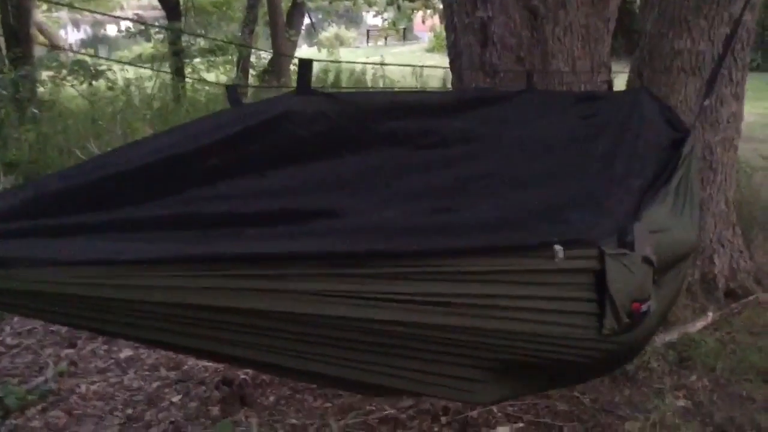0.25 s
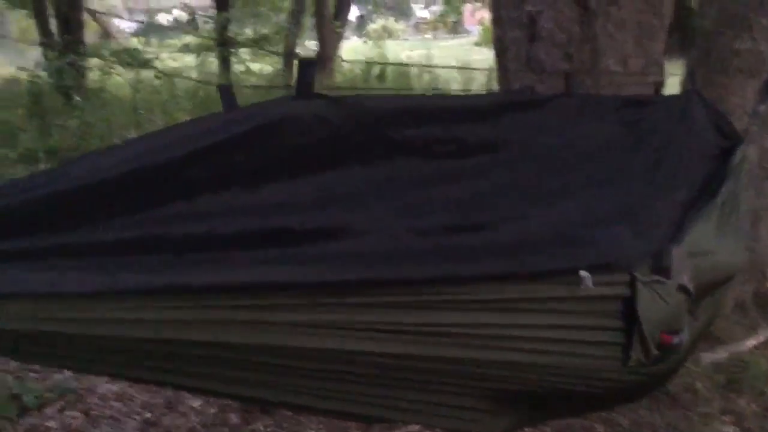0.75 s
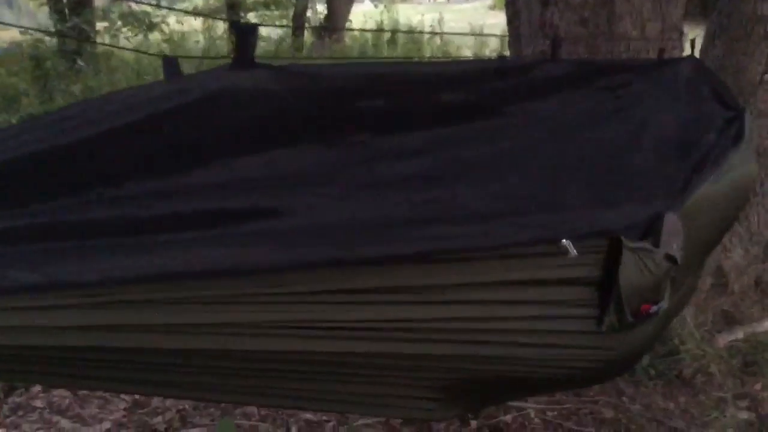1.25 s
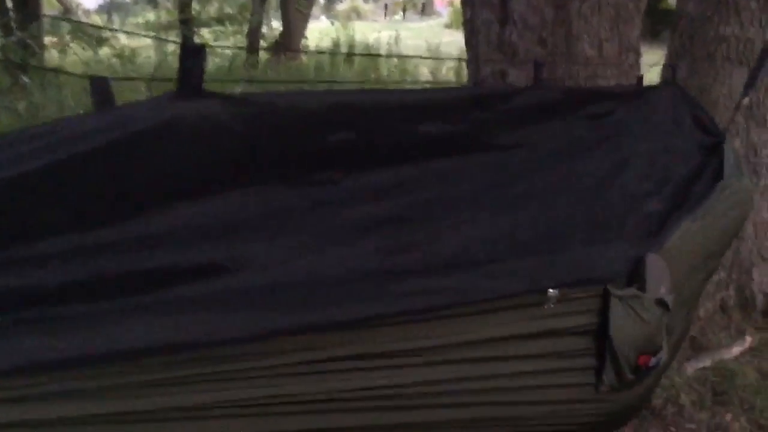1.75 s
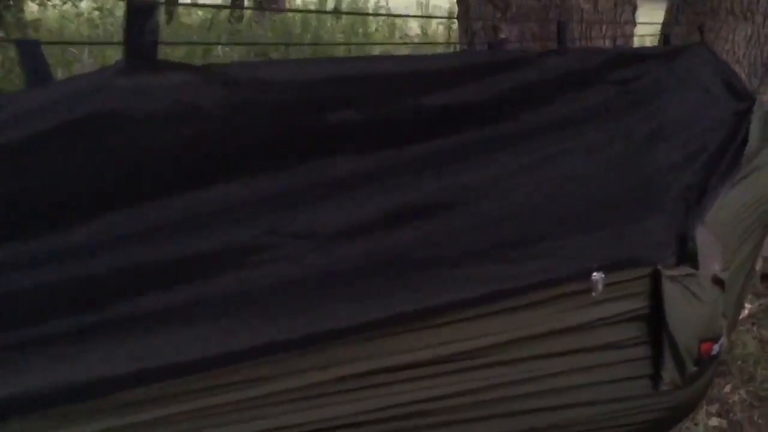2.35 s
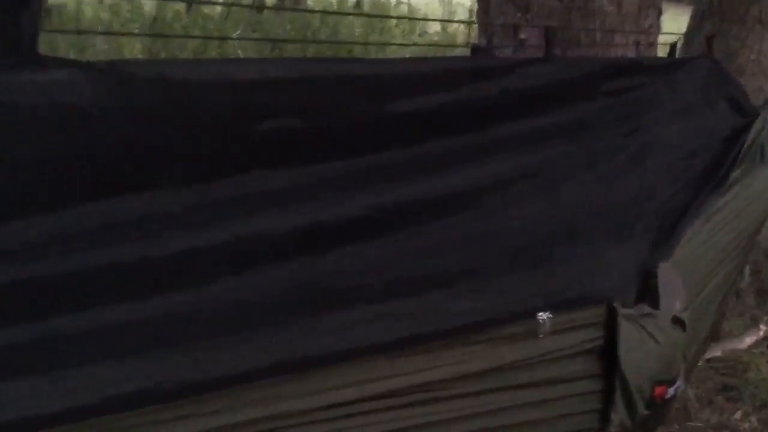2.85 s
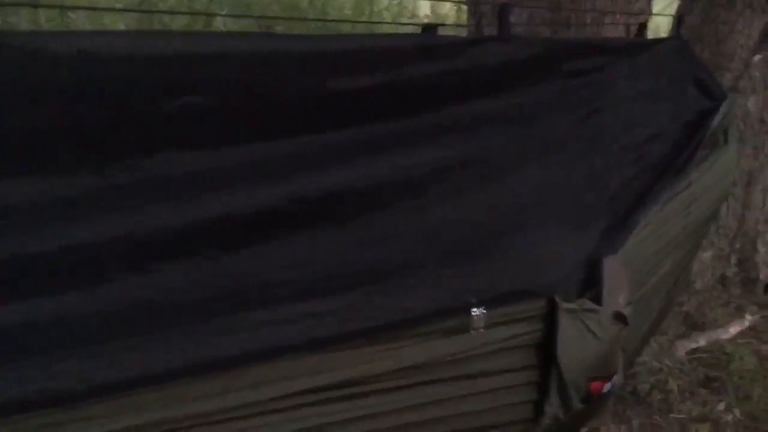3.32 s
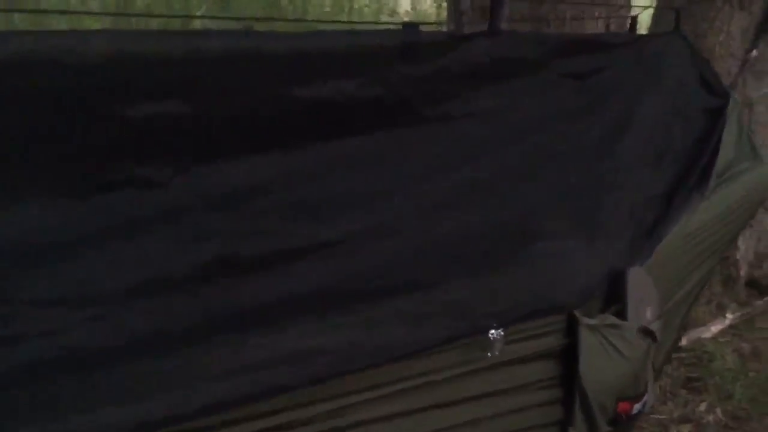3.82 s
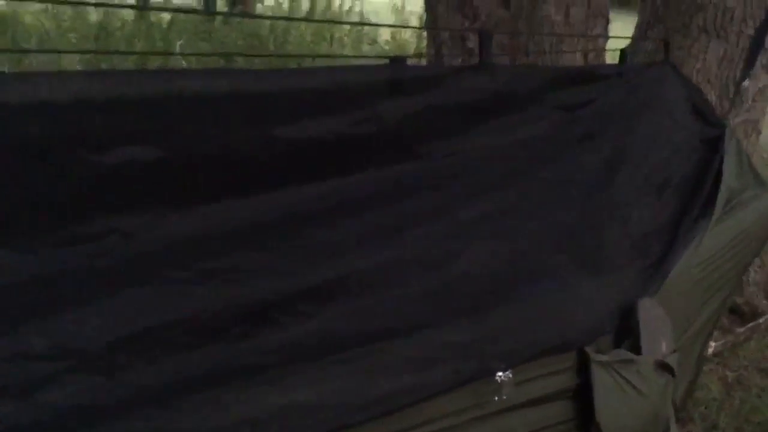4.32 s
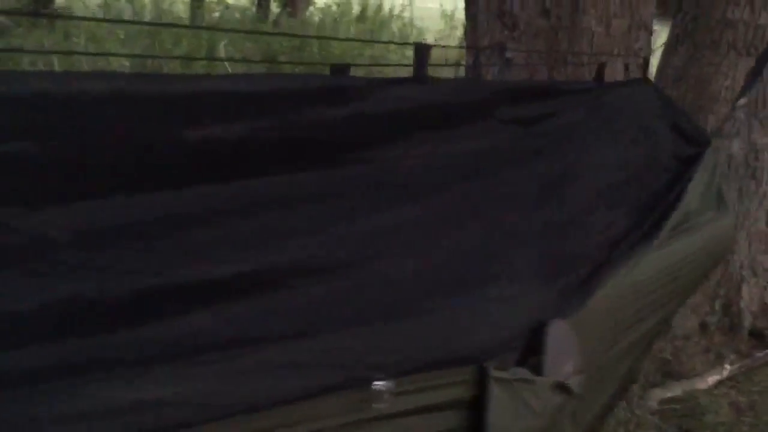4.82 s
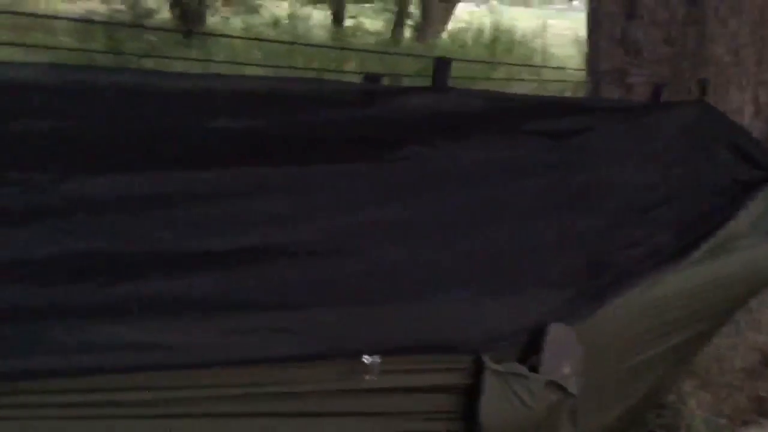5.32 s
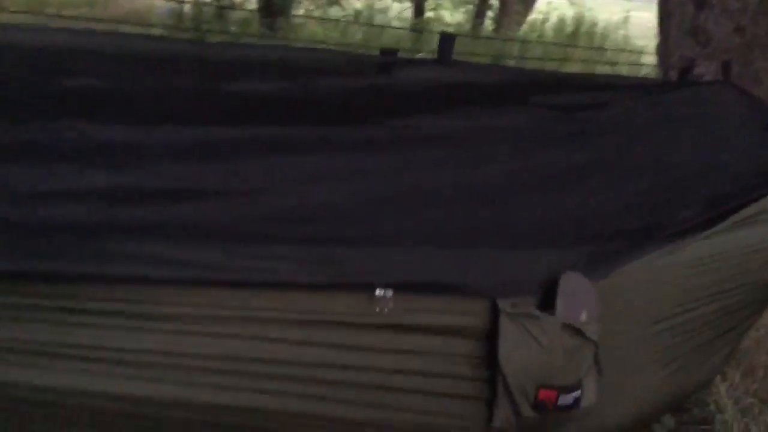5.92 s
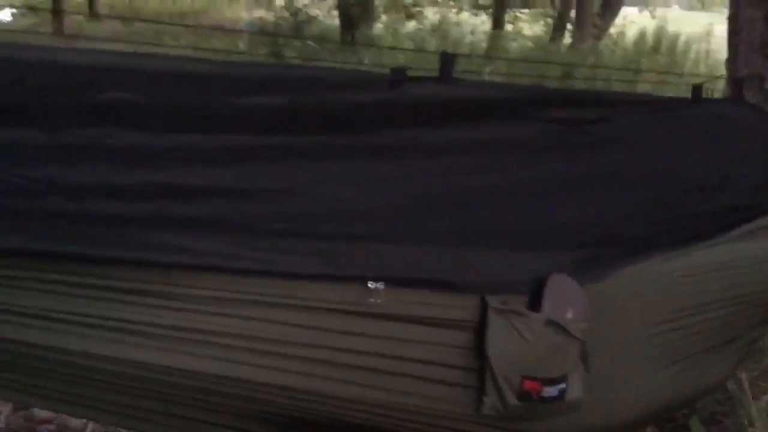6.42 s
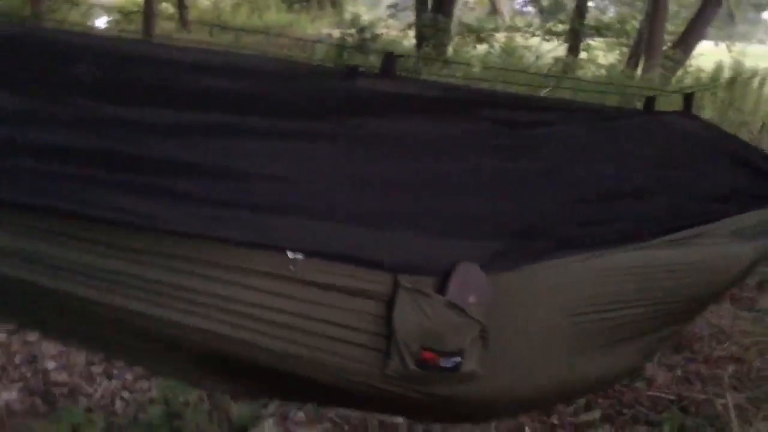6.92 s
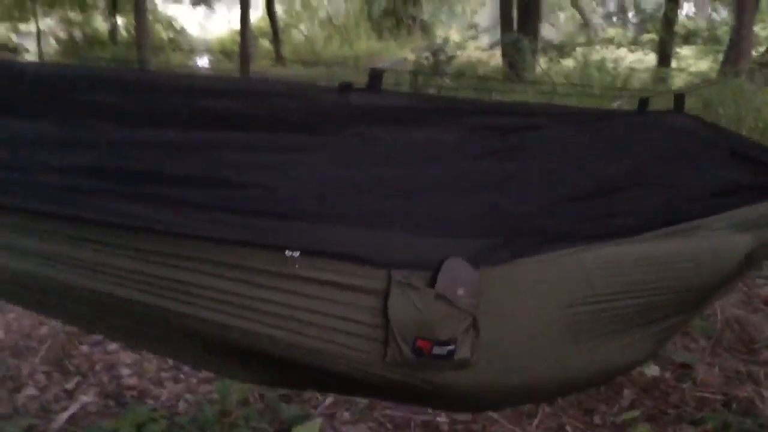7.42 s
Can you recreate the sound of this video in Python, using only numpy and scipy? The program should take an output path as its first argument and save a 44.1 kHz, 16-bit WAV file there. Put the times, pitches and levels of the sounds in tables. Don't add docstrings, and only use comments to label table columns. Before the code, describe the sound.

A close, dry, brittle texture of twig ticks and crumpling leaves under slow soft footsteps. The first half is sparse, with one small woody crack; three loud snaps follow in the second half, then busier scraping, clicks and a split snap. Distant vehicles swell gently and fade, a far cricket pulses early, insects hiss steadily, and one faint bird-like call comes near the end. Open wooded place, small hand-held microphone with little bass.

```python
import sys
import numpy as np
from scipy import signal
from scipy.fft import rfft, irfft, next_fast_len
from scipy.io import wavfile
from scipy.ndimage import uniform_filter1d

SR = 44100
rng = np.random.default_rng(int(sys.argv[2]) if len(sys.argv) > 2 else 0)


def unload_audio(sound):
    columns = np.transpose(np.atleast_2d(sound))
    steps = np.round(np.clip(columns, -1, 1) * 32767)
    wavfile.write(sys.argv[1], SR, steps.astype(np.int16))


def invert_db(level):
    return 10 ** (np.asarray(level, dtype=float) / 20)


N = 337754

PORT_HZ = 11870


def shape(x, db_of_hz):
    size = next_fast_len(N)
    f = np.maximum(np.arange(size // 2 + 1) * SR / size, 1)
    steady_top_hz = 15780
    gain = invert_db(db_of_hz(f)) * (f < steady_top_hz)
    y = irfft(rfft(x, size) * gain, size)[:N]
    return y / np.std(y)


def colour(x, points):
    hz, db = np.transpose(points)
    return shape(x, lambda f: np.interp(np.log(f), np.log(hz), db))


def band(x, hz, width):
    return shape(x, lambda f: -10 * np.log10(np.e) * ((f - hz) / width) ** 2)


def noise_band(hz, width):
    return band(rng.standard_normal(N), hz, width)


def walk(rate):
    k = int(SR / rate)
    held = np.repeat(rng.standard_normal(N // k + 1), k)
    return 1.5 * uniform_filter1d(uniform_filter1d(held, k), k)[:N]


def grit(rate, spread_db, smooth):
    hit = rng.random(N) < rate / SR
    size_db = spread_db * np.minimum(rng.exponential(1, N), 3)
    grains = hit * rng.choice([-1, 1], N) * invert_db(size_db)
    return grains / np.std(grains) + smooth * rng.standard_normal(N)


def ring(hz, tau, turn=0.):
    t = np.arange(1024) / SR
    envelope = (t / tau * np.exp(1 - t / tau)) ** 2
    wave = np.cos(2 * np.pi * (hz * (t - tau) + turn))
    return envelope * (wave - np.sum(envelope * wave) / np.sum(envelope))


def add(out, s, x):
    i = int(s * SR)
    out[i:i + len(x)] += x[:N - i]


def curve(table):
    rows = np.array(table, float)
    return [np.interp(np.arange(N) / SR, rows[:, 0], c) for c in rows.T[1:]]


def swell(s, gain, rise_s, hold_s, fall_s):
    t = np.arange(0, N, 32)[:, None] / SR
    before = np.maximum(s - t, 0) / rise_s
    after = np.maximum(t - s - hold_s, 0) / fall_s
    envelope = np.sum(gain * invert_db(-25 * (before + after)), axis=1)
    return np.interp(np.arange(N) / SR, t[:, 0], envelope)


def crack(snap, wood, pitch):
    _, db, hz, twin_db, upper_db = snap
    knock_db, knock_hz, middle_db, thud_db, edge_db = wood
    port = ring(pitch * hz, 0.000289)
    port += invert_db(twin_db) * ring(1.2 * pitch * hz, 0.000278)
    port -= invert_db(upper_db + 12.5) * ring(PORT_HZ, 0.000424)
    fibres = rng.standard_normal(1024) * np.exp(-np.arange(1024) / SR / 0.0011)
    frayed = np.convolve(fibres, ring(7600, 0.000195))[:1024]
    knock = invert_db(knock_db) * ring(pitch * knock_hz, 0.00028)
    middle = invert_db(middle_db + 4.5) * ring(1500, 0.00035)
    edge = invert_db(edge_db + 9) * ring(14700, 0.00031)
    thud = invert_db(thud_db + 14.0) * ring(583, 0.00043)
    return invert_db(db) * (port + invert_db(-31) * frayed) - knock - middle + edge - thud


def snaps():
    # start [s], peak [dB], ring [Hz], twin ring [dB], upper ring [dB].
    snap_rows = [
        (0.858, -26, 7150, -11, -29.5),
        (4.579, -10.5, 7940, -16, -24.5),
        (5.1846, -10, 7720, -8.5, -17),
        (5.4633, -8, 7570, -21.5, -31.5),
        (6.9204, -18, 6900, -2.5, -22),
        (7.3769, -26, 7660, -17, -28),
        (7.5036, -23, 7950, -22, -23),
    ]
    # knock peak [dB], knock [Hz], middle, thud and edge [dB].
    wood_rows = [(-35, 3400, -55, -67, -66), (-31.5, 2860, -54, -50.5, -54), (-38, 2540, -54, -47.5, -43),
                 (-22, 3470, -50, -46.5, -40), (-23.5, 2930, -34, -42.5, -41), (-48, 2800, -58, -50, -59),
                 (-69, 2700, -59, -61, -53)]
    # wait [s], level under the first [dB].
    second_cracks = [(.0033, -21), (0.0044, -3.5), (0.012, -41), (.0051, -18), (0.0043, -12), (0.0048, -30),
                     (.0044, -32)]
    out = np.zeros(N)
    for snap, wood, (wait, again_db) in zip(snap_rows, wood_rows, second_cracks):
        s = snap[0]
        add(out, s + .0005, invert_db(-18) * crack(snap, wood, 0.943))
        add(out, s + .001, crack(snap, wood, 0.96))
        add(out, s + .0006 + wait, invert_db(again_db - 18) * crack(snap, wood, 0.93))
        add(out, s + .0011 + wait, invert_db(again_db) * crack(snap, wood, 0.92))
    return out


def wood_chip():
    # start [s], peak [dB], ring [Hz].
    chip_rows = [
        (2.799, -18.5, 2180),
    ]
    out = np.zeros(N)
    for s, db, hz in chip_rows:
        burst = ring(hz, 0.0005) + invert_db(-3.5) * ring(10600, .00006)
        burst += invert_db(-22) * ring(0.32 * hz, 0.00056) + invert_db(-15.5) * ring(2.0 * hz, 0.00024)
        splinter = ring(1.15 * hz, 0.00039) + ring(1.7 * hz, 0.00022)
        add(out, s + 0.00021, invert_db(db) * burst)
        add(out, s + 0.00166, invert_db(db - 24) * ring(1.7 * hz, 0.00048))
        add(out, s + .0035, invert_db(db - 15) * splinter)
    return out


def ticks():
    # start [s], peak [dB], ring [Hz].
    tick_rows = [(0.143, -49, 7900), (0.5367, -42, 14100), (0.6804, -42, 7840), (0.76, -41, 8070),
                 (1.0221, -50, 7660), (1.068, -48, 9000), (2.2228, -41, 13900), (2.238, -36.5, 9800),
                 (2.2754, -48, 8100), (2.4543, -42, 7850), (2.4944, -49, 7830), (2.6074, -46, 8140),
                 (3.29, -53, 11000), (3.359, -45, 10500), (4.7456, -41, 8050), (4.974, -42, 7860),
                 (4.9949, -56, 7780), (5.0097, -34, 7800), (5.4938, -48, 8000), (6.02, -38, 7900),
                 (6.0402, -45, 7840), (6.0556, -44, 8100), (6.558, -44, 7900), (6.6603, -30, 7800),
                 (6.679, -30, 7960), (7.1571, -43, 7860), (7.198, -28, 7940), (7.2279, -39, 8270),
                 (7.4649, -33, 7580)]
    out = np.zeros(N)
    for (s, db, hz), turn in zip(tick_rows, rng.random(len(tick_rows))):
        tick = ring(hz, 0.000243, turn) + invert_db(-4.5) * ring(PORT_HZ, 0.00029)
        add(out, s + 0.00048, invert_db(db - 5.5) * tick)
    return out


def litter_knocks():
    # start [s], peak [dB], ring [Hz].
    seed_rows = [(0.9477, -57, 2360), (2.3094, -58, 4800), (2.4294, -57, 5940), (2.6078, -54, 4700),
                 (5.0085, -51, 6200), (5.7952, -57.5, 2260), (6.7475, -55, 4460), (6.788, -53, 4560),
                 (6.8283, -49, 5340), (6.85, -55, 5230), (6.9455, -49, 2210)]
    # start [s], peak [dB], ring [Hz].
    knock_rows = [
        (1.051, -61, 625),
        (6.308, -52, 810),
        (6.531, -59.5, 460),
        (6.831, -55, 1680),
        (6.873, -56, 1250),
        (6.978, -55, 550),
        (7.655, -56, 1900),
    ]
    out = np.zeros(N)
    for s, db, hz in seed_rows:
        add(out, s, invert_db(db + 5) * (ring(hz, 0.84 / hz) + invert_db(-10) * ring(0.45 * hz, 0.99 / hz)))
    for s, db, hz in knock_rows:
        add(out, s, invert_db(db + 4.5) * (ring(hz, 1.49 / hz) + invert_db(-12) * ring(1.9 * hz, 0.67 / hz)))
    return out


def strokes():
    # top reached [s], level [dB], rise [s], hold [s], fall [s].
    stroke_rows = [(.165, -63, 0.046, .015, .04), (.55, -73, .1, .08, 0.071),
                   (.735, -66, .05, 0.023, 0.026), (1.025, -51.5, 0.098, 0.011, 0.037),
                   (2.839, -56, .07, 0.022, 0.051), (3.77, -57, 0.061, .002, .055),
                   (4.17, -65.5, .05, .02, .06), (4.645, -56, 0.045, .003, 0.026),
                   (4.744, -50.5, .022, .002, 0.083), (4.923, -71, .03, .01, 0.052),
                   (5.012, -49.5, 0.056, 0.0035, 0.026), (5.21, -67, .01, .01, .06),
                   (5.497, -53, 0.039, .002, .005), (5.678, -45.5, 0.065, 0.043, .036),
                   (6.061, -52.5, 0.047, .004, 0.019), (6.132, -58.5, 0.031, .002, 0.087),
                   (6.292, -60, 0.095, .004, 0.061), (6.536, -52.5, 0.12, .002, 0.1),
                   (6.662, -50.5, 0.042, .006, 0.024), (6.975, -43.5, 0.071, 0.032, 0.027),
                   (7.163, -44, 0.046, 0.04, 0.032), (7.231, -43.5, 0.024, .018, 0.0055),
                   (7.384, -51.5, .005, .002, 0.031), (7.468, -45, 0.064, 0.0303, 0.0034)]
    # frequency [Hz], density [dB per Hz].
    port_points = [(1290, -36), (2200, -15.5), (2890, -24), (3700, -21), (4220, -27.5), (4860, -23),
                   (5410, -23), (6540, -3.5), (8100, -1), (10200, -19), (10900, -14.5), (11900, -8.5),
                   (13000, -15), (14300, -13), (15800, -24)]
    sheen_db = [0.1, 0.1, 2, -0.5, -1, -1, 1.5, 5, -1, -1, 1, 0, -2, 0.5, 2, -2, 10, -1, 9, 0.5, 1, 1, 3, 3]
    rub, fine = (grit(4000, 3.2, 0.62) * invert_db(2.3 * walk(200)) for _ in range(2))
    main_points = [(hz, db - 25 * (hz > 10300) - 15 * (hz < 4500)) for hz, db in port_points]
    bright_points = [(hz, db - 25 * (hz < 10000)) for hz, db in port_points]
    main = colour(rub, main_points)
    bright = colour(fine + 0.23 * rub, bright_points)
    thud, shell = band(fine, 1080, 810), band(rub, 3640, 570)
    s, db, rise, hold, fall = np.transpose(stroke_rows)
    ref_db, thud_growth = -50.5, 0.32
    press_db = ref_db + thud_growth * (db - ref_db)
    push = swell(s, invert_db(db), rise, hold, fall)
    press = swell(s, invert_db(press_db), 1.76 * rise, hold, 2.1 * fall)
    sheen = swell(s, invert_db(db - 10.5 + np.array(sheen_db)), rise, hold, fall)
    return push * (main + invert_db(-24) * shell) + sheen * bright + press * invert_db(-16) * thud


def leaves():
    # top reached [s], crisp level [dB], hold [s],
    # papery body against it [dB], share of broad leaves [0-1].
    tread_rows = [(0.153, -82, 0.042, -14, .16), (0.51, -73, 0.03, -13, 0), (0.603, -73, .05, -7, .6),
                  (1.133, -69, 0.36, -7, .2), (1.66, -75.5, 0.18, -9, .3), (1.89, -73.5, .05, -1.5, .2),
                  (2.164, -60, 0.1, -8.5, 0.1), (2.345, -67, .09, -4, 0.4), (2.49, -67.5, .03, -16, .7),
                  (2.566, -70.5, .04, -8, .2), (3.05, -82, .03, -17, .3), (3.498, -73, 0.16, -12, .3),
                  (3.94, -68, .012, -2, 0.4), (4.187, -74, 0.17, -12, .3), (4.844, -68, .012, -22, 1),
                  (5.084, -67, .04, -14, .9), (5.272, -69.5, .012, 1, .2), (5.585, -60, 0.052, -20, .9),
                  (5.94, -74, .03, -2, .3), (6.108, -73, 0.2, -2, 0.2), (6.78, -69, 0.08, -4.5, .4),
                  (7.03, -61.5, 0.026, -8.5, .4), (7.27, -77, 0.022, -1.5, .4), (7.51, -69, .01, -7, .4),
                  (7.62, -70, .05, -9, .45)]
    crumple = grit(900, 3.7, .9) * invert_db(1.4 * walk(60))
    small, broad = band(crumple, 13000, 4500), band(crumple, 10200, 1800)
    body = band(crumple, 3410, 1700)
    s, db, hold, body_db, share = np.transpose(tread_rows)

    def tread(gain):
        rise_s, fall_s = 0.078, 0.093
        return swell(s, invert_db(db) * gain, rise_s, hold, fall_s)

    steps = tread(1 - share) * small + tread(share) * broad + tread(invert_db(body_db)) * body
    settle = invert_db(-83.5 + 1.6 * walk(6)) * (small + invert_db(-3.5) * body)
    return steps + settle


def lorry():
    # time [s], rumble [dB], firing tone [dB].
    pass_rows = [
        (0, -74, -85),
        (1., -74.5, -97),
        (2.4, -72, -92),
        (3.4, -71, -80),
        (3.97, -68, -67),
        (4.35, -65, -68.5),
        (5., -71, -69.5),
        (5.6, -92, -87),
        (7.66, -74.5, -73),
    ]
    rumble_db, tone_db = curve(pass_rows)
    return invert_db(rumble_db - 9) * noise_band(88, 25.5) + invert_db(tone_db - 5) * noise_band(134.6, 3.6)


def whine():
    # time [s], pitch [Hz], level [dB].
    glide = [
        (0, 1028, -67),
        (.08, 927, -67.5),
        (.13, 880, -81),
        (.2, 900, -130),
    ]
    hz, db = curve(glide)
    return invert_db(db + 5.5) * np.sin(2 * np.pi * np.cumsum(hz) / SR)


def road():
    # nearest [s], level [dB], time to fade [s].
    car_rows = [
        (0., -74, 0.5),
        (3.86, -62.5, 1.4),
        (6.15, -67, 1.14),
        (7.66, -65, 1.1),
    ]
    s, db, fade = np.transpose(car_rows)
    cars = np.hypot(invert_db(-68.5), swell(s, invert_db(db), fade, 0, fade))
    roar = noise_band(992, 267) + invert_db(-7.5) * noise_band(1520, 440)
    return cars * invert_db(-4.5 + walk(2.59) + 1.26 * walk(9)) * roar


def motor_drone():
    # time [s], level [dB].
    level_points = [
        (0, -68),
        (.55, -75),
        (1.3, -64),
        (2.4, -67),
        (3.2, -64.5),
        (4.2, -68.5),
        (5.5, -72),
        (6.6, -95),
        (7.66, -75),
    ]
    hum = noise_band(192.8, 10.2) + invert_db(-15) * noise_band(383.4, 9.5)
    return invert_db(curve(level_points)[0] - 2) * hum


def insects():
    high = invert_db(-70.5 + 0.64 * walk(8.6) + 0.53 * walk(1.9)) * noise_band(7920, 420)
    low = invert_db(-81 + 1.2 * walk(5)) * noise_band(5750, 230)
    return high + low


def cricket():
    # top reached [s], level [dB].
    bout_rows = [(.16, -78), (.53, -73), (.9, -76), (1.1, -77), (1.35, -77), (1.75, -75), (2.2, -77),
                 (2.59, -76), (2.8, -89), (3.02, -83), (3.45, -78), (3.92, -79), (4.5, -84)]
    s, db = np.transpose(bout_rows)
    rise_s, hold_s, fall_s = 0.26, 0.032, 0.2
    return swell(s, invert_db(db - 1.0), rise_s, hold_s, fall_s) * noise_band(5110, 200)


def bird_call():
    # top reached [s], level [dB], rise [s], hold [s], fall [s].
    call_row = (7.06, -73, .03, .14, .45)
    # multiple of the pitch, level [dB].
    partials = [(8, -12), (9, -7), (10, 0), (11, -17)]
    s, db, rise, hold, fall = call_row
    turns = np.cumsum(367.5 * (1 + 0.0045 * walk(70))) / SR
    tone = np.zeros(N)
    for k, part_db in partials:
        tone += invert_db(part_db + 4 * walk(50)) * np.sin(2 * np.pi * k * turns)
    return swell(s, invert_db(db), rise, hold, fall) * tone


def far_hush():
    # frequency [Hz], density [dB per Hz].
    hush_points = [(24, -51), (40, -41), (65, -13.5), (201, 1), (300, -5.5), (608, -12), (1110, -8.5),
                   (1230, -12), (3550, -25.5), (5730, -21.5), (6330, -23.5), (7950, -11), (8790, -23),
                   (15300, -25), (16500, -51)]
    return invert_db(-62.5 + 0.5 * walk(1.2)) * colour(rng.standard_normal(N), hush_points)


def scene():
    twigs = snaps() + wood_chip() + ticks() + litter_knocks()
    traffic = lorry() + whine() + road() + motor_drone()
    nature = insects() + cricket() + bird_call()
    return (twigs + strokes() + leaves() + traffic + nature + far_hush())[None]


def band_limit(x):
    return signal.sosfilt(signal.butter(12, 17000, fs=SR, output="sos"), x)


def record(dry):
    bass_cut = signal.butter(3, 64, "highpass", fs=SR, output="sos")
    top_cut = signal.ellip(6, .3, 60, 16600, fs=SR, output="sos")
    mix = signal.sosfilt(top_cut, signal.sosfilt(bass_cut, dry))
    return band_limit(mix)


dry = scene()
out = record(dry)
unload_audio(out)
```